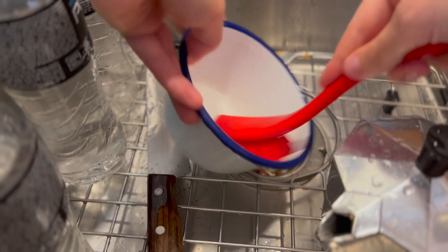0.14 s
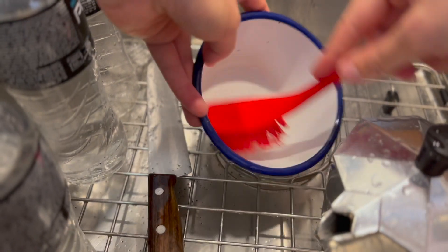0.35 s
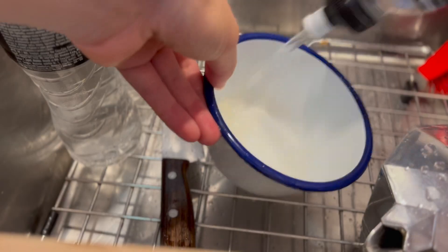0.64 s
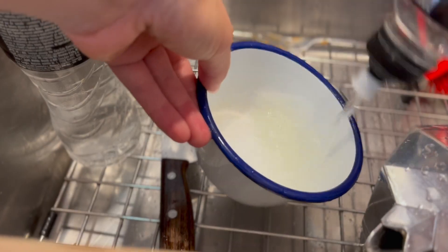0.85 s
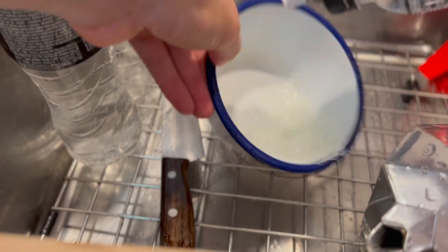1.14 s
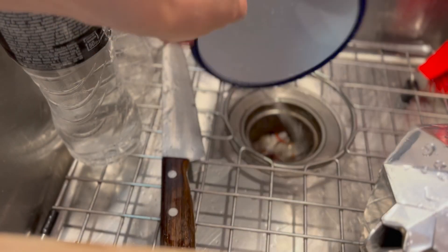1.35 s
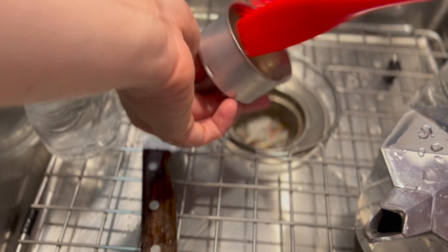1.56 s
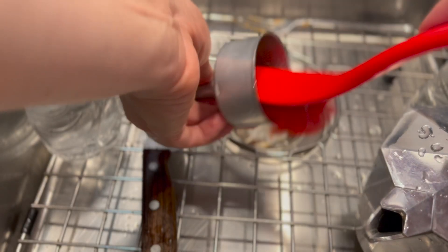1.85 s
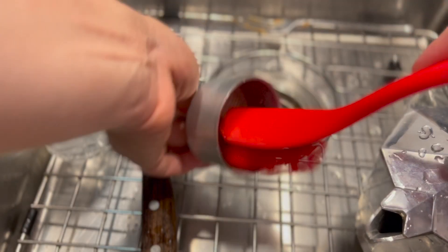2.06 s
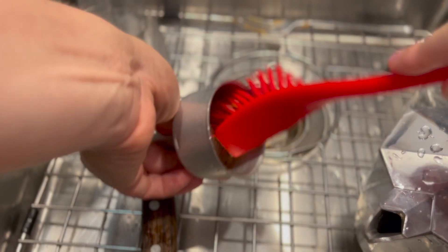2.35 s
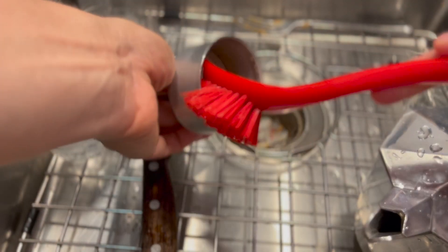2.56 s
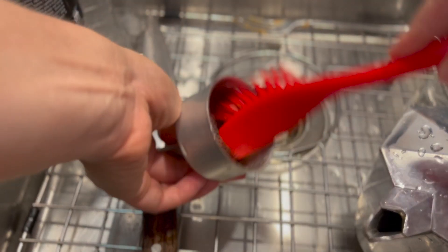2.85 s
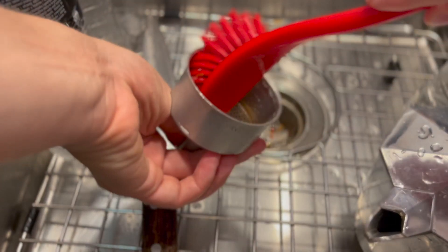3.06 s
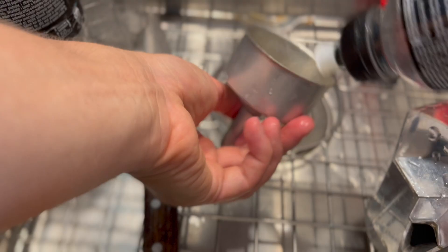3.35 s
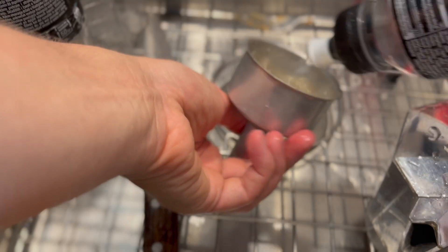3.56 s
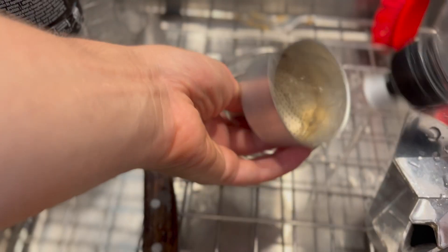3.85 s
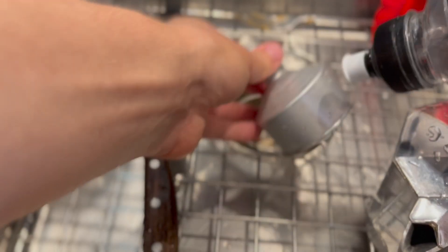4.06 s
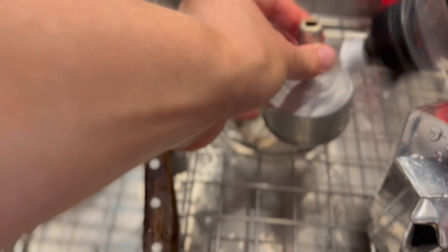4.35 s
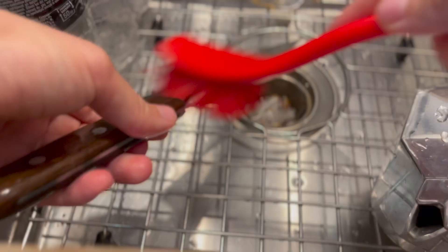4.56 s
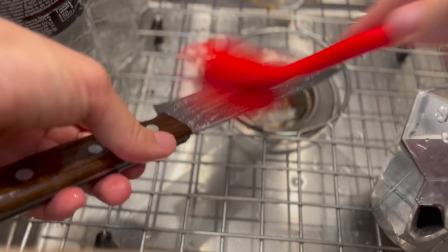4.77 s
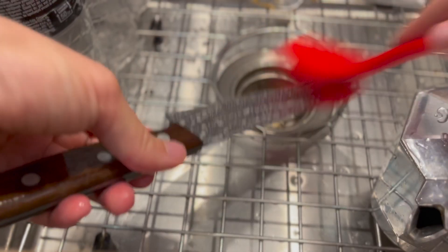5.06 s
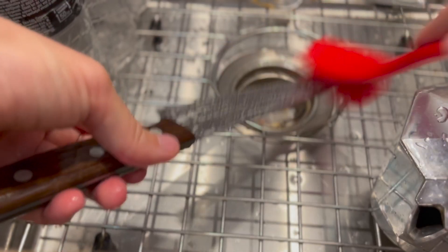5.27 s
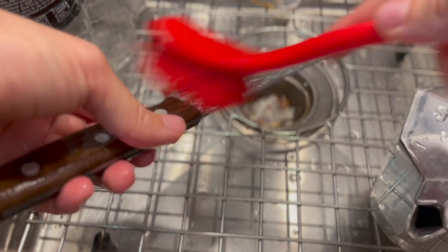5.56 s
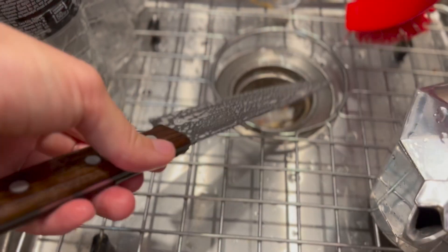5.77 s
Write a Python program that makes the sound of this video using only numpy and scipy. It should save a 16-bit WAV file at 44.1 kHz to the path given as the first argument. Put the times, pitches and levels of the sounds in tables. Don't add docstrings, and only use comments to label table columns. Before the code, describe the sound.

A brush knocks and scrubs an enamel bowl, then a small metal funnel, then a knife, with water trickling and splashing in a steel sink.

```python
import sys
import numpy as np
from scipy import signal
from scipy.fft import rfft, irfft, next_fast_len
from scipy.io import wavfile
from scipy.ndimage import uniform_filter1d, map_coordinates

SR = 44100
rng = np.random.default_rng(int(sys.argv[2]) if len(sys.argv) > 2 else 0)


def gain_from_db(level_db):
    decades = np.asarray(level_db, float) / 20
    return 10 ** decades


def materialize(psi):
    bounded = np.clip(np.atleast_2d(psi).T, -1, 1)
    quanta = np.round(bounded * 32767).astype(np.int16)
    wavfile.write(sys.argv[1], SR, quanta)


N = 260190

# time in seconds, level in dB.
HUM_LEVEL = [(0.0, -51), (1.38, -45.5), (1.64, -42), (4.2, -41), (5.0, -42.5), (5.9, -42)]
# frequency in Hz, level in dB per Hz.
HUM_SPECTRUM = [(25, -29), (45, -3), (60, 4), (75, -3), (92, 1.5), (125, -10.5), (166, 1.5), (210, -16),
                (320, -24), (400, -16.5), (700, -25), (1500, -40), (7000, -48.5)]
BRISTLE_SPECTRUM = [(300, -45), (3000, -16), (5000, -15), (8000, -2), (11500, 0.0), (13000, 0.5),
                    (15000, -1), (15900, -2.5)]
SHEET_SPECTRUM = [(400, -33.5), (800, 3), (980, 4), (1500, -16.5), (2400, 0), (4000, -11.5), (5500, -3),
                  (8000, -3), (12000, -7), (15500, -17)]

# time in seconds, peak at 1-3 kHz in dB,
# hollowness in dB, brightness in dB, 60 dB decay in seconds.
BOWL_KNOCKS = [(0.0105, -21.5, 0, 2.5, 0.019), (0.022, -29.5, 1.5, -1, 0.13), (0.033, -25, -0.5, 5, 0.05),
               (0.263, -16.5, -4.5, -18.5, 0.042), (0.278, -29.5, -8, -13, 0.059),
               (0.300, -20.5, -8.5, -6, 0.061), (0.404, -33, -28, -8, 0.057),
               (0.504, -18, -11, -2.5, 0.043), (0.516, -32.5, -5, -16.5, 0.1)]
BOWL_DRIPS = [(0.5773, -49.5, -10, -9, 0.065), (0.613, -42.5, -22, -7, 0.033),
              (0.7078, -39, -29, -9, 0.057), (0.7189, -39.5, -25, -14, 0.08)]
FUNNEL_KNOCKS = [(1.433, -20, -22.5, -2.5, 0.07), (1.479, -32.5, -11, -7, 0.09),
                 (1.5395, -31, -14, -4, 0.04), (1.6176, -11.5, -5.5, -7, 0.041),
                 (1.8692, -18, -7, -5, 0.06), (1.956, -32.5, -3, -2, 0.034),
                 (1.9986, -24.5, -30, -13, 0.025), (2.0323, -29, -15, -22, 0.033),
                 (3.3494, -35.5, 8, -2, 0.042)]
BASIN_KNOCKS = [(3.704, -29, 11.7, 9, 0.025), (3.72, -41.5, 7.2, -6, 0.14), (3.99, -55.5, 22.3, 0.5, 0.105),
                (4.004, -57, 13, -6, 0.04)]
RACK_KNOCKS = [(3.936, -25, 6, 16.3, 0.034), (3.944, -30.5, 2, 3.9, 0.17), (3.958, -24, 2, 1.1, 0.07),
               (3.975, -29, -1, 1.5, 0.052)]

# frequency in Hz, width in Hz, level in dB.
BOWL_RIM = [(546, 53, 4), (908, 110, 1.5), (1514, 167, 1.5), (2130, 220, 1.5), (2420, 140, 3),
            (3130, 80, -2), (3970, 96, -9.5)]
WET_BOWL = [(1272, 18, -12), (1470, 22, -17), (2000, 19, -5), (2360, 47, -4.5), (3130, 37, -25)]
FUNNEL_RIM = [(554.6, 19, 6.5), (918, 47, -2.5), (1396, 49, 5.5), (1707, 73, -1.5), (3400, 120, -41),
              (4120, 146, -6.5)]
BASIN = [(154, 29, 2.5), (271, 97, 1), (340, 120, -0.5), (421, 48, 0), (755, 200, -18), (1520, 190, -8),
         (3060, 170, -16), (3850, 44, -10), (4440, 290, 1.5), (4830, 138, -21), (6840, 140, -9)]
RACK = [(920, 38, -16.5), (1400, 190, -1), (2530, 1800, -19), (2950, 120, -2), (4570, 450, -3.5),
        (5100, 135, 6), (5730, 100, 8.5), (6680, 180, 0.5)]
# frequency in Hz, width in Hz, level in dB.
BOWL = [(520, 48, -19), (1520, 77, -8), (2060, 40, -14), (2498, 36, 4), (4030, 29, -2), (4900, 24, -5),
        (5950, 44, -7.5), (7000, 46, -2)]
FUNNEL = [(970, 30, -16.5), (1364, 31, 7), (1540, 220, -5.5), (1780, 106, 1), (2032, 53, -7),
          (2555, 16, -10.5), (3260, 340, -15), (3730, 36, -5.5), (4920, 55, -16.5)]
BLADE = [(4600, 1100, 17), (6250, 1100, 5), (2820, 500, -7)]
BASIN_BOOM = [(110, 72, 1), (250, 34, 4), (318, 28, 0)]

# start in seconds, length in seconds, hiss in dB,
# place of the strongest moment from 0 to 1, body ring relative to the hiss in dB.
BOWL_STROKES = [(.06, 0.059, -52, 0.8, 0.5), (.125, 0.18, -53.5, 0, -2), (.33, 0.12, -52.5, 0.7, 0),
                (.47, 0.013, -38, 0.4, -11.5)]
FUNNEL_STROKES = [(1.44, 0.19, -54, 0.56, -8), (1.675, 0.093, -51, 0.62, 2.5), (1.76, 0.21, -48, 0.2, -2.5),
                  (1.99, .045, -55, .2, 8.5), (2.04, 0.14, -44, 0.15, 4), (2.2, 0.078, -58, .1, 9),
                  (2.29, 0.31, -46.5, 0.47, 5), (2.62, 0.25, -42.5, 0.74, -3), (2.92, 0.11, -51, .1, -2),
                  (3.08, 0.091, -43.5, 0.85, -2), (3.19, 0.093, -41, 0.79, -2),
                  (3.29, 0.039, -52.5, 0.24, 4)]
KNIFE_STROKES = [(4.652, 0.083, -39, 0.6, -25), (4.745, 0.079, -39, 0.18, -17),
                 (4.84, 0.092, -36, 0.68, -20), (4.94, 0.027, -33, 0.4, -7), (4.98, 0.06, -41, .2, -16),
                 (5.048, 0.076, -32.5, 0.34, -13.5), (5.146, 0.035, -38.5, 0.7, -10),
                 (5.19, 0.07, -43.5, 0.64, -27), (5.25, 0.091, -38.5, 0.96, -14),
                 (5.352, 0.088, -44, 0.19, -18), (5.446, 0.094, -37, 1, -25), (5.55, 0.038, -39, .7, -9),
                 (5.594, 0.07, -41.5, 0.53, -25)]
# time in seconds, peak in dB.
FUNNEL_SNAPS = [(2.0593, -33), (2.068, -26.5), (2.1376, -33), (2.151, -34), (2.2529, -35), (2.2988, -35),
                (2.318, -37), (2.3661, -38), (2.396, -27), (2.413, -26), (2.425, -21), (2.5213, -32),
                (2.6061, -37), (2.6884, -33), (2.7303, -33), (2.766, -24), (2.8046, -28), (2.8824, -19),
                (3.075, -36), (3.092, -39), (3.1059, -38), (3.1414, -30), (3.1597, -24), (3.2077, -29),
                (3.2391, -30), (3.2765, -28), (3.3204, -30)]
KNIFE_SNAPS = [(4.6593, -40), (4.6678, -34), (4.706, -33), (4.7506, -35), (4.8504, -36), (4.872, -34),
               (4.925, -32), (4.9466, -30), (4.97, -31), (5.0609, -33), (5.0674, -30), (5.085, -30),
               (5.115, -32), (5.1507, -35), (5.172, -35), (5.2589, -36), (5.3248, -31), (5.3567, -35),
               (5.448, -41)]
# start in seconds, length in seconds,
# level in dB, place of the strongest moment from 0 to 1, brighter partial relative to it in dB.
CUP_PUFFS = [(1.715, 0.083, -46, .5, -12), (1.815, 0.041, -40.5, .8, -15), (1.872, 0.013, -30.5, .6, -18),
             (1.905, .012, -41, .5, -15), (1.935, 0.012, -34, .5, -14.5), (1.955, 0.012, -28, .8, -15.5),
             (2.295, 0.038, -42.5, 0.3, -20), (2.415, 0.026, -40.5, 0.6, -28),
             (2.65, 0.063, -46, 0.5, -13.5), (2.76, .16, -52, 0.1, -10.5), (3.09, 0.088, -49.5, 0.5, -4),
             (3.2, 0.063, -48.5, .4, -5), (3.29, 0.057, -52, 0.6, -4)]

# start in seconds, length in seconds, trickle in dB,
# place of the strongest moment from 0 to 1, spray relative to the trickle in dB.
TRICKLES = [(.54, 0.43, -48.5, 0.77, -11), (1.14, 0.27, -45, 0.78, -13.5), (3.36, 0.3, -63, 0.18, -6),
            (3.58, 0.11, -57, 0.74, -4), (3.74, 0.071, -64, 0.2, -2), (3.82, 0.15, -51, 1, -7.5),
            (4.0, 0.2, -48, 0.21, -3), (4.285, 0.07, -55, 0.3, -0.5), (4.37, 0.037, -55, 0.2, -9.5),
            (4.43, 0.26, -54.5, 0.31, 2.5)]
# time in seconds, peak in dB, bubble pitch in Hz.
WATER_DROPS = [(0.6803, -42, 2620), (0.8175, -39.5, 1430), (0.8455, -33.5, 2720), (0.8984, -37, 2260),
               (0.9357, -35.5, 2730), (0.965, -35.5, 6920), (0.9885, -40.5, 3240), (1.152, -37.5, 4200),
               (1.2221, -41, 2130), (1.268, -30.5, 1010), (1.327, -27, 4160), (1.347, -28.5, 3190),
               (1.379, -35.5, 965), (3.8153, -29, 7400), (3.8252, -30.5, 4300), (4.021, -39, 3130),
               (4.0495, -30, 1780), (4.105, -26, 4340), (4.169, -25.5, 691), (4.376, -41, 4340),
               (4.5007, -30.5, 6660), (4.5563, -37.5, 4830)]
STEEL_DROPS = [(0.879, -37, 2350), (1.305, -34, 2450), (3.3853, -40, 2640), (3.472, -51, 1200),
               (3.4989, -43, 4250), (3.5604, -48, 3400), (3.578, -39.5, 2040), (0.7608, -51, 2540),
               (0.7, -40.5, 3000), (0.782, -53, 3500), (3.642, -32.5, 1770), (4.07, -23.5, 4500),
               (4.105, -43, 5280), (4.2884, -30, 2980), (4.247, -48, 5400), (4.3306, -48, 3000),
               (4.352, -50, 5000), (4.434, -47, 5000), (4.446, -35, 3200), (4.468, -46, 2500),
               (4.537, -41, 6000), (4.4777, -28, 6400), (4.594, -39, 4140), (5.761, -44, 1680),
               (5.841, -43.5, 1380)]
# start in seconds, length in seconds, level in dB,
# place of the strongest moment from 0 to 1, second voice in dB (unheard).
SPLASH_SHEET = [(1.023, 0.053, -28, 0.74, 0)]
SPLASH_BOOM = [(1.028, 0.081, -34, 0.45, 0)]
# time in seconds, level in dB, half width in seconds.
RACK_NUDGES = [(4.312, -46, 0.026), (4.51, -45, 0.026), (4.58, -47.5, 0.019)]

# attack in seconds, 60 dB release in seconds,
# sag away from the strongest moment in dB per second, how far the second voice follows as a power.
BOWL_MANNER = (0.033, 0.21, 107, 0.65)
FUNNEL_MANNER = (0.024, 0.14, 51.3, 0.69)
KNIFE_MANNER = (0.018, 0.083, 67, 0.63)
FLOW_MANNER = (0.026, 0.31, 71, 1.2)
PUFF_MANNER = (0.011, 0.057, 41, 0.99)
SHEET_MANNER = (0.0059, 0.074, 31, .9)
BOOM_MANNER = (0.014, 0.12, 90, .9)

# frequency in Hz, echo share in dB.
SINK_ECHO = [(60, -22.5), (350, -3.5), (900, 0), (2000, 0), (6000, -2), (9000, -9.5), (16000, -14)]
# frequency in Hz, lead of the right in radians.
PORT_LEAD = [(100, 0), (400, -.15), (700, -.8), (1500, -1.6), (2100, -.3), (3000, -.9), (5000, -.6),
             (6000, 1.1)]
# frequency in Hz, left minus right in dB.
PORT_LEAN = [(60, -0.4), (130, -1.5), (300, -2), (600, 0), (2000, 1), (5000, 4.5), (7500, 1)]


def unit(x):
    return x / np.sqrt(np.mean(x ** 2) + 1e-20)


def along(points, hz):
    f, v = np.transpose(points)
    return np.interp(np.log(hz + 1), np.log(f + 1), v)


def wobble(rate):
    knots = rng.standard_normal(int(N * rate / SR) + 4)
    return map_coordinates(knots, [np.arange(N) * rate / SR])


def filtered(x, response):
    n = x.shape[-1]
    m = next_fast_len(n + 2048)
    return irfft(rfft(x, m) * response(np.fft.rfftfreq(m, 1 / SR)), m)[..., :n]


def modes(table, between_db, scatter_db=0):
    gains = gain_from_db(np.array(table)[:, 2] + scatter_db * rng.standard_normal(len(table)))

    def response(f):
        total = gain_from_db(between_db)
        for k, (centre, width, _) in enumerate(table):
            damping = 1j * f * width
            total = total + (-1) ** k * gains[k] * damping / (centre ** 2 - f ** 2 + damping)
        return total
    return response


def gritty(grit_db, clump_db):
    return unit(rng.standard_normal(N) * gain_from_db(grit_db * wobble(900) + clump_db * wobble(70)))


def add(track, s, sound):
    part = track[round(s * SR):][:len(sound)]
    part += sound[:len(part)]


def gestures(rows, manner):
    attack, release, sag, follows = manner
    out = np.zeros((2, N))
    for s, length, db, place, second_db in rows:
        t = np.arange(round((length + release) * SR)) / SR
        rise = np.sin(np.pi / 2 * np.minimum(t / attack, 1)) ** 2
        sag_db = -sag * np.abs(np.minimum(t, length) - place * length)
        release_db = -60 * np.maximum(t - length, 0) / release
        shape = rise * gain_from_db(sag_db + release_db)
        add(out[0], s, gain_from_db(db) * shape)
        add(out[1], s, gain_from_db(db + second_db) * shape ** follows)
    return out


def room():
    s, db = np.transpose(HUM_LEVEL)
    hum = unit(filtered(rng.standard_normal(N), lambda f: gain_from_db(along(HUM_SPECTRUM, f)) * (f > 20)))
    return gain_from_db(np.interp(np.arange(N) / SR, s, db) - 0.5 + 0.27 * wobble(3.42)) * hum


def knocks(table, body, between_db, crack, gain_db, top_db):
    track, t = np.zeros(N), np.arange(6144) / SR
    lead_in = 256
    for s, db, low_db, high_db, t60 in table:
        decay = gain_from_db(-60 * t / t60) + crack * gain_from_db(-60 * t / 0.0057)
        push = rng.standard_normal(len(t)) * decay * (1 - np.exp(-t / 0.0013))
        push[8] += 6 * crack
        ring = modes(body, between_db, scatter_db=0.5)

        def registers(f):
            edges = [1 / (1 + (f / c) ** 8) for c in (1100, 3000, 7500)]
            bands = np.diff([0 * f, *edges, 0 * f + 1], axis=0)
            return ring(f) * bands * f / (f + 120)
        parts = filtered(np.pad(push, (lead_in, 0)), registers)
        parts[:, :lead_in] *= np.linspace(0, 1, lead_in) ** 8
        parts = parts / np.abs(parts).max(axis=1, keepdims=True)
        levels = gain_from_db([low_db, 0, high_db, top_db + 0.85 * high_db])
        add(track, s - lead_in / SR, gain_from_db(db + gain_db) * (levels @ parts))
    return track


def brush(strokes, body, between_db, grit_db, clump_db, ring_db, manner):
    speed, drive = gestures(strokes, manner)
    slips = gritty(grit_db, clump_db)
    hiss = unit(filtered(slips, lambda f: gain_from_db(along(BRISTLE_SPECTRUM, f))))
    grips = np.clip(.5 + 0.084 * wobble(1.8), 0, 1)
    holds = [modes(body, between_db, scatter_db=0.5) for _ in range(2)]
    pair = filtered(drive * slips, lambda f: [hold(f) * f / (f + 400) / (1 + (f / 7000) ** 4) for hold in holds])
    ring = unit(grips * pair[0] + (1 - grips) * pair[1])
    return gain_from_db(8) * speed * hiss + gain_from_db(ring_db) * np.sqrt(np.mean(drive ** 2)) * ring


def bubbles(count, centre_hz, spread, cycles, size_db):
    u, t = rng.standard_normal((count, 3)), np.arange(280) / SR
    hz = np.clip(centre_hz * np.exp(spread * u[:, :1]), 300, 15000)
    fade = np.exp(-t * hz / cycles) * (1 - np.exp(-t * hz / 4.0))
    grain = gain_from_db(size_db * u[:, 1:2]) * np.sin(2 * np.pi * hz * t) * fade
    at = rng.integers(0, N, count)[:, None] + np.arange(len(t))
    return unit(np.bincount(at.ravel(), grain.ravel())[:N])


def trickle():
    flow, mist = gestures(TRICKLES, FLOW_MANNER)
    rush = np.zeros(N)
    for hz, db in [(1300, -0.5), (2600, 3.5), (5000, -1)]:
        surge = rng.standard_normal(N) * gain_from_db(5.4 * wobble(900) + 4.5 * wobble(35))
        rush += gain_from_db(db) * filtered(surge, modes([(hz, 0.52 * hz, 0)], -61))
    spray = unit(filtered(gritty(3.5, 5.0), lambda f: 1 / (1 + (7000 / (f + 1)) ** 4)))
    beads = bubbles(count=3500, centre_hz=2700, spread=0.522, cycles=5.6, size_db=6.5)
    wet = 0.55 * beads + 0.8 * unit(rush)
    return gain_from_db(-3.0) * flow * wet + gain_from_db(10.5) * mist * spray


def drops(table, spray_db, purity):
    track, t = np.zeros(N), np.arange(3072) / SR
    for s, db, hz in table:
        fade = gain_from_db(-60 * t / (0.012 + 38 / hz * purity / .6)) * (1 - np.exp(-t / 0.0009))
        bubble = np.sin(2 * np.pi * hz * t * (1 + 3 * t))
        near_pitch = modes([(hz, hz * (1.8 - 2.2 * purity), 0)], -40)
        noise = rng.standard_normal((2, len(t)))
        burst, spray = filtered(noise, lambda f: [near_pitch(f) ** 2, 1 / (1 + (8000 / (f + 1)) ** 6)])
        body = purity * bubble + 0.61 * hz / (hz + 1200) * unit(burst)
        add(track, s, fade * (gain_from_db(db + 1.5) * body + gain_from_db(db + spray_db - 7.0) * unit(spray)))
    return track


def splash():
    fall = gestures(SPLASH_SHEET, SHEET_MANNER)[0]
    swell = gestures(SPLASH_BOOM, BOOM_MANNER)[0]
    sheet = unit(filtered(gritty(1.3, 1.12), lambda f: gain_from_db(along(SHEET_SPECTRUM, f)) * (f > 300)))
    boom = unit(filtered(rng.standard_normal(N), modes(BASIN_BOOM, between_db=-50)))
    track = gain_from_db(3.0) * fall * sheet + swell * boom
    t = np.arange(-300, 300) / SR
    slap = np.sin(2 * np.pi * 260 * t) * np.exp(-(t / 0.0026) ** 2)
    add(track, 1.096, gain_from_db(-26) * slap)
    return track


def cup_air():
    hollow, partial = gestures(CUP_PUFFS, PUFF_MANNER)
    tones = [modes([(568, 65, 0)], -80), modes([(975, 90, 0)], -80)]
    low, high = filtered(gritty(2.2, 2.9), lambda f: [tone(f) ** 2 for tone in tones])
    return hollow * unit(low) + partial * unit(high)


def snaps(table, body, between_db, gain_db):
    track, t = np.zeros(N), np.arange(1024) / SR
    for s, db in table:
        fade = gain_from_db(db - 60 * t / 0.022) * (1 - np.exp(-t / 0.0006))
        add(track, s, fade * rng.standard_normal(len(t)))
    return gain_from_db(gain_db) * filtered(track, lambda f: modes(body, between_db)(f) * f / (f + 600))


def grumble():
    t = np.arange(N) / SR
    swell = sum(gain_from_db(db) * np.exp(-((t - s) / half) ** 2) for s, db, half in RACK_NUDGES)
    shudder = modes([(130, 60, 0), (220, 80, -2), (320, 50, 0)], -60)
    return swell * unit(filtered(gritty(2.5, 1.5), shudder))


def sink(x):
    hop, t = 4096, np.arange(2048) / SR
    padded = np.pad(x, (hop, hop))
    window = np.hanning(2 * hop) ** .5
    out = np.zeros((2, N + 4 * hop))
    for start in range(0, N, hop):
        tail = rng.standard_normal((2, len(t))) * gain_from_db(-60 * t / 0.046)
        piece = padded[start:start + 2 * hop]
        piece = piece * window[:len(piece)]
        echo = signal.fftconvolve(piece[None], tail / np.linalg.norm(tail[0]), axes=1)
        out[:, start:start + echo.shape[1]] += echo
    return filtered(out[:, hop:hop + N], lambda f: gain_from_db(along(SINK_ECHO, f)))


def scene():
    scrub = brush(BOWL_STROKES, BOWL, between_db=-41, grit_db=2.0, clump_db=2.0, ring_db=6.0, manner=BOWL_MANNER)
    scrub += brush(FUNNEL_STROKES, FUNNEL, between_db=-21.5, grit_db=2.6, clump_db=2.5, ring_db=3.5,
                   manner=FUNNEL_MANNER)
    scrub += brush(KNIFE_STROKES, BLADE, between_db=-21, grit_db=1.0, clump_db=1.5, ring_db=-4.5,
                   manner=KNIFE_MANNER)
    blows = knocks(BOWL_KNOCKS, BOWL_RIM, between_db=-20.0, crack=1.0, gain_db=-1.0, top_db=11.0)
    blows += knocks(BOWL_DRIPS, WET_BOWL, between_db=-30, crack=0.91, gain_db=1.0, top_db=9)
    blows += knocks(FUNNEL_KNOCKS, FUNNEL_RIM, between_db=-18.5, crack=2.2, gain_db=-1.5, top_db=6.5)
    blows += knocks(BASIN_KNOCKS, BASIN, between_db=-12, crack=0.5, gain_db=5.0, top_db=5)
    blows += knocks(RACK_KNOCKS, RACK, between_db=-15.5, crack=1.5, gain_db=-2.05, top_db=9.0)
    blows += snaps(FUNNEL_SNAPS, FUNNEL, between_db=-19, gain_db=12.5)
    blows += snaps(KNIFE_SNAPS, BLADE, between_db=-12, gain_db=-19)
    water = drops(WATER_DROPS, spray_db=-24, purity=.6)
    water += drops(STEEL_DROPS, spray_db=11.5, purity=.12)
    steady = scrub + cup_air() + trickle() + splash() + room() + grumble()
    sharp = blows + water
    return steady + sharp + sink(steady + gain_from_db(-0.5) * sharp)


def joint_stereo(pair, weak_db, waver_db, from_hz):
    sum_and_difference = np.array([pair[0] + pair[1], pair[0] - pair[1]]) / 2
    hz, _, z = signal.stft(sum_and_difference, SR, nperseg=2048)
    power = np.add.reduceat(np.abs(z) ** 2, np.arange(0, len(hz), 32), axis=1)
    waver = uniform_filter1d(rng.standard_normal(power.shape), size=3) * np.sqrt(3)
    limit = gain_from_db(2 * (weak_db + waver_db * waver))
    treble = power[:, 5:].sum(axis=(0, 1)) + 1e-20
    calm = treble < gain_from_db(2 * 10) * np.roll(treble, 1)
    weak = np.repeat(calm & (power < limit * power[::-1]), 32, axis=1)[:, :len(hz)]
    kept = z * ~(weak & (hz > from_hz)[:, None])
    mid, side = signal.istft(kept, SR, nperseg=2048)[1][:, :N]
    return np.array([mid + side, mid - side])


def low_pass(x):
    return signal.sosfilt(signal.butter(12, 16820, fs=SR, output="sos"), x)


def record(dry):
    half = np.array([[-.5], [.5]])

    def ports(f):
        lead = along(PORT_LEAD, f) + 2 * np.pi * 143e-6 * np.maximum(f - 6280, 0)
        roll_off = 1 / (1 + (f / 15750) ** 90)
        return np.exp(1j * half * lead) * gain_from_db(-half * along(PORT_LEAN, f)) * roll_off
    pair = joint_stereo(filtered(dry, ports), weak_db=-5.5, waver_db=2.2, from_hz=6800)
    return low_pass(pair)


dry = scene()
out = record(dry)
materialize(out)
```